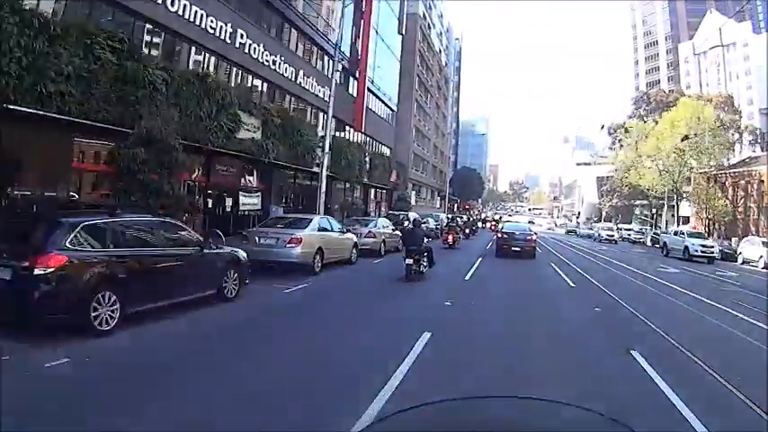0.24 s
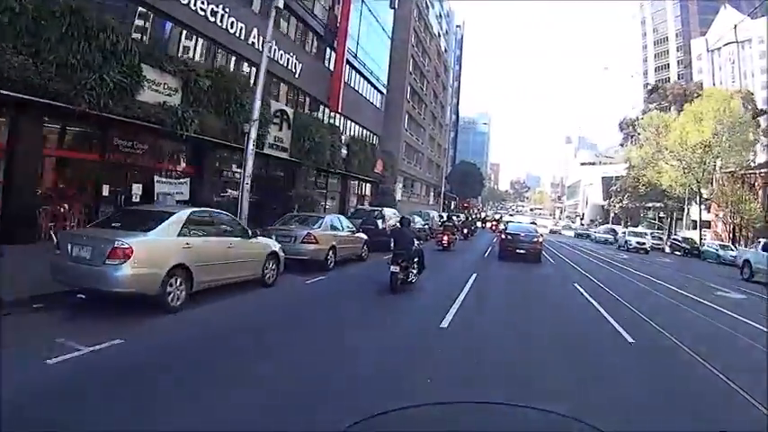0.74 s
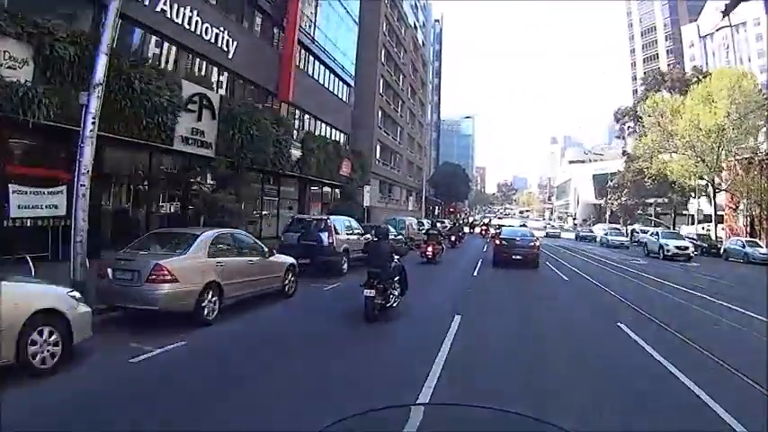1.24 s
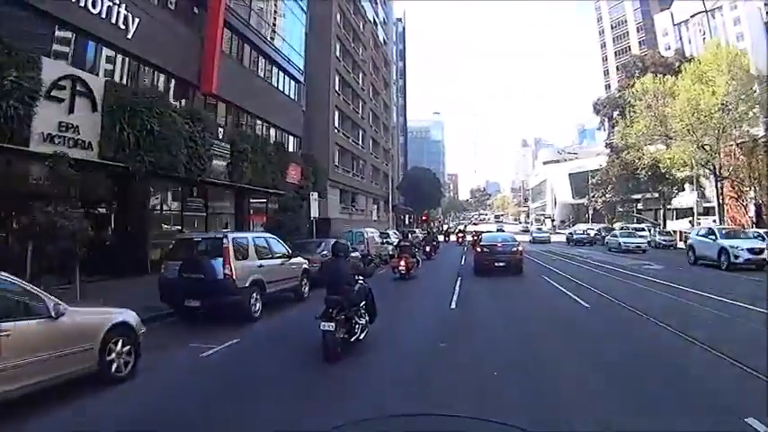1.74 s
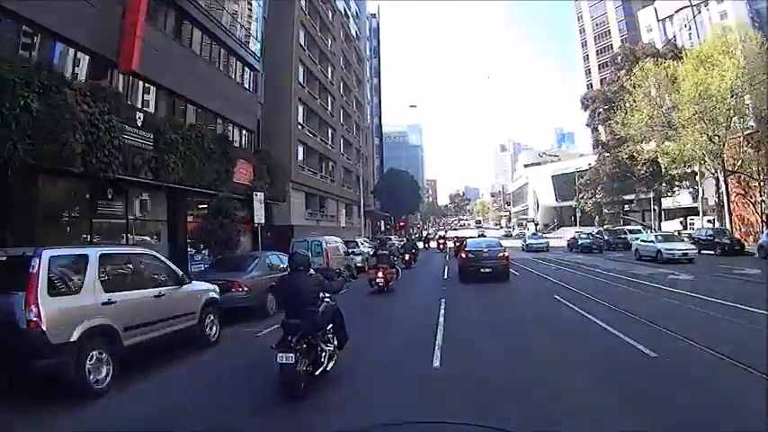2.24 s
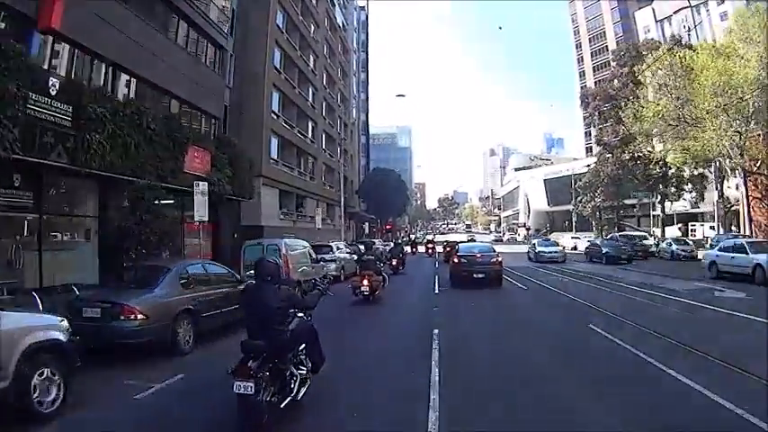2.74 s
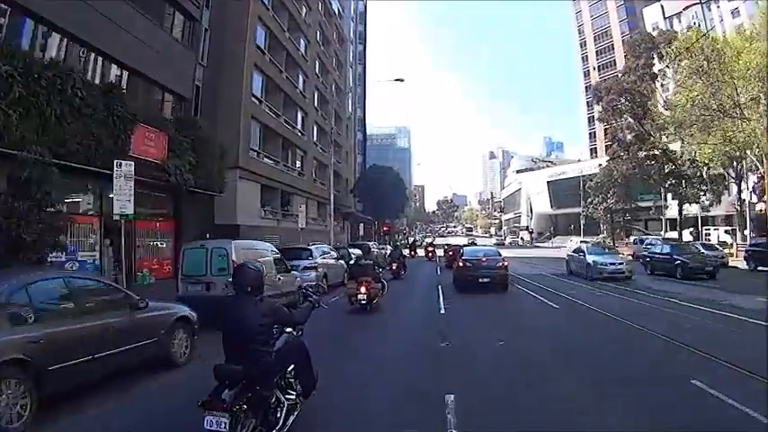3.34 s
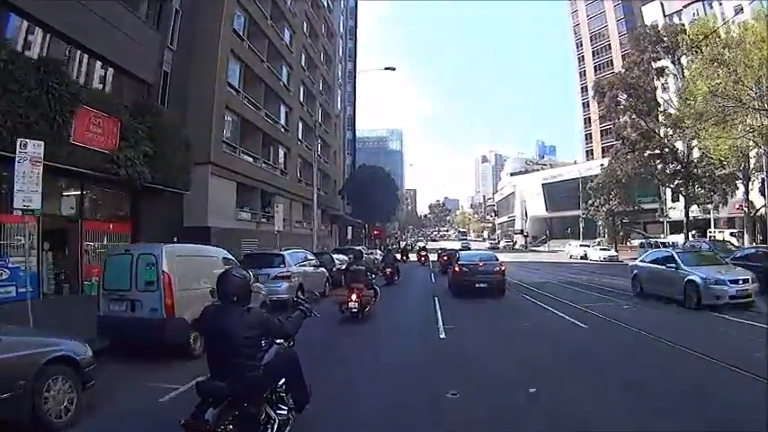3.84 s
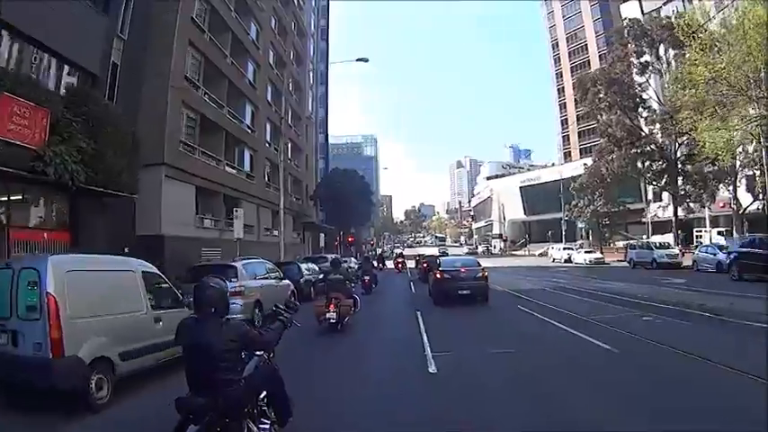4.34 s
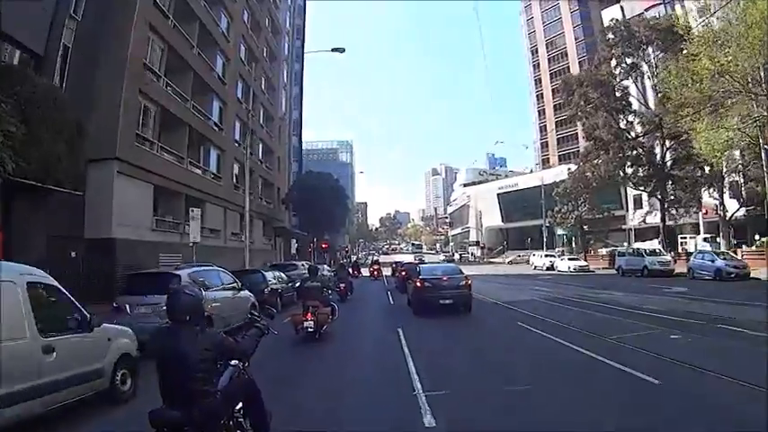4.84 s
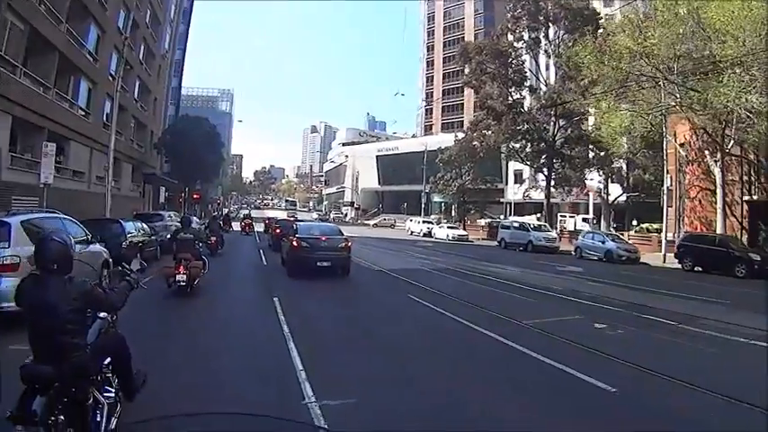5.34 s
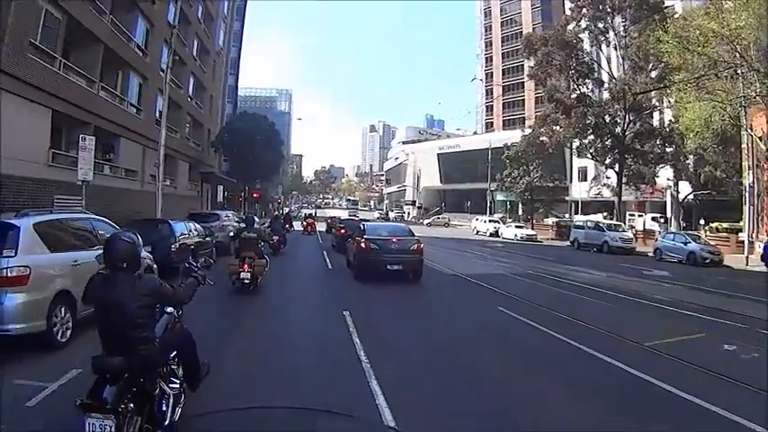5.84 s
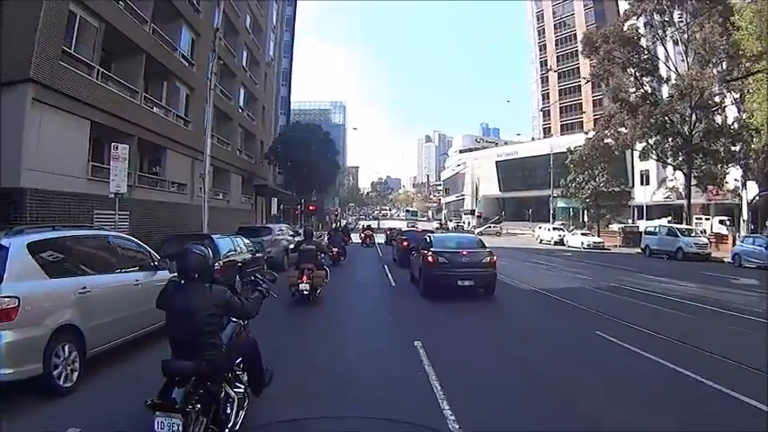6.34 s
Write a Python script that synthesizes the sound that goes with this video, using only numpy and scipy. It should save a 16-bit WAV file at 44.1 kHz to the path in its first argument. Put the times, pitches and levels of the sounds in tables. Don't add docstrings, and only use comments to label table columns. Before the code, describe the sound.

Heard from a small enclosed camera on a motorcycle coasting along a city street behind other bikes. From 0 to 1.5 s the engine is under most load: dense rattling clatter, a hollow mid-pitched roar and low, uneven exhaust thuds, with hard chain slaps around 0.7-1.2 s and a sweep of air near 1.2 s. The clatter then drops and the twin settles into a low, lumpy rumble with brief throttle swells near 1.4, 3.2 and 6 s. A metallic clack ticks steadily, about three per second, clearer after 1.7 s. A thin, high brake squeal at nearly constant pitch chirps on and off, strongest around 2.5 s, recurring to the end. Light chain slaps cluster near 4.2 s, with a small air puff and slight engine rise around 4.3 s. Tyre hiss, a nearby car's faint hum and distant traffic continue underneath; wide but boxy stereo, dull at the very top.

```python
import sys
import numpy as np
from scipy import signal
from scipy.fft import rfft, irfft, next_fast_len
from scipy.io import wavfile
from scipy.ndimage import uniform_filter1d, map_coordinates

SR = 44100
rng = np.random.default_rng(int(sys.argv[2]) if len(sys.argv) > 2 else 0)


def wav_record(signal):
    frames = np.transpose(np.atleast_2d(signal))
    bounded = np.clip(frames, -1, 1)
    quanta = np.round(bounded * 32767).astype(np.int16)
    wavfile.write(sys.argv[1], SR, quanta)


def rack_gain(trim_db):
    fader = np.asarray(trim_db, float)
    return 10 ** (fader / 20)


N = 290178


def unit(x):
    return x / np.sqrt(np.mean(x ** 2) + 1e-20)


def curves(rows):
    s, *cols = np.transpose(rows)
    return [np.interp(np.arange(N) / SR, s, c) for c in cols]


def on_log(rows, hz):
    f, *cols = np.transpose(rows)
    return [np.interp(np.log(hz + 1), np.log(f + 1), c) for c in cols]


def wobble(rate):
    knots = rng.standard_normal(int(N * rate / SR) + 4)
    curve = map_coordinates(knots, [np.arange(N) * rate / SR])
    return curve - uniform_filter1d(curve, size=SR // 5)


def swells(rows):
    s, length, *gains_db = np.transpose(rows)
    t = np.arange(0, N + 99, 100) / SR
    bells = np.exp(-(2 * (t[:, None] - s) / length) ** 2)
    return [np.interp(np.arange(N) / SR, t, bells @ g) for g in gains_db]


def filtered(x, response):
    m = next_fast_len(N + SR // 2)
    return irfft(rfft(x, m) * response(np.fft.rfftfreq(m, 1 / SR)), m)[..., :N]


def ring(x, modes, steep):
    def response(f):
        power = 0
        for c, w, db in modes:
            power = power + rack_gain(2 * db / steep) * (f * w) ** 2 / ((c * c - f * f) ** 2 + (f * w) ** 2)
        cepstrum = irfft(steep / 2 * np.log(power + 1e-9))
        half = len(cepstrum) // 2
        cepstrum[1:half] *= 2
        cepstrum[half + 1:] = 0
        return np.exp(rfft(cepstrum))
    return filtered(x, response)


def noise():
    return rng.standard_normal((2, N))


def firings(rate, uneven, jitter, scatter_db):
    k = np.arange(1, int(np.sum(rate) / SR))
    chance = rng.standard_normal((len(k), 3))
    turns = k + uneven * (k % 2) + jitter * chance[:, 0]
    at = np.interp(turns, np.cumsum(rate) / SR, np.arange(N)).astype(int)
    shared = np.bincount(at, rack_gain(scatter_db * chance[:, 1]), N)
    return np.array([shared, np.bincount(at, chance[:, 2], N)])


def puffs(beats, t60, rise):
    t = np.arange(SR // 10) / SR
    envelope = (1 - np.exp(-t / rise)) * rack_gain(-60 * t / t60)
    return signal.fftconvolve(beats, envelope[None], axes=1)[:, :N]


# time_s, level_db
LOAD = [(0.0, -27), (0.48, -26), (1.28, -30.5), (1.43, -33), (2.22, -37.5), (2.56, -37), (3.76, -39.5),
        (4.16, -38), (4.34, -35.5), (4.69, -36), (5.46, -40.5), (5.96, -38.5), (6.17, -37), (6.58, -38.5)]


def strain_db():
    load_db = curves(LOAD)[0]
    return load_db - load_db.mean()


# pitch_hz, level_db (per Hz)
TYRES = [(500, -11.5), (700, -11), (780, -0.5), (880, -1.5), (990, 0.5), (1180, -3.5), (1320, -11.5),
         (1500, -15), (3000, -15), (11000, -31)]
# pitch_hz, level_db (per Hz)
TRAFFIC = [(20, -21), (45, 7), (300, -1), (400, 1), (600, 3.5), (750, 1), (1000, -19), (2000, -54)]
# start_s, rise_s
# (negative: a jump, no ramp), far_db, near_db
CAR = (1.5, -0.8, -52, -43)
# pitch_hz, width_hz, level_db
CAR_HUM = [(978, 67, 1.5), (800, 69, -4)]


def street():
    def wash(colour):
        hiss = unit(filtered(noise(), lambda hz: rack_gain(on_log(colour, hz)[0])))
        return rack_gain(3.2 * wobble(9.8)) * hiss

    s, rise, *far_near_db = CAR
    car_db = np.interp(np.arange(N) / SR, (s, s + rise), far_near_db)
    flecks = rack_gain(2.5 * wobble(14))
    car = flecks * rack_gain(car_db) * unit(ring(noise(), CAR_HUM, steep=1.82))
    tyre_db = -37.5 + 0.36 * strain_db()
    echo_db = 0.56 * swells(BLIPS)[1]
    traffic_db = -37 + 0.55 * strain_db() + echo_db
    return rack_gain(tyre_db) * wash(TYRES) + rack_gain(traffic_db) * wash(TRAFFIC) + car


# time_s, firings_per_s, beat_db (clean beat's share of the low sound)
REVS = [(0, 40, -1.5), (.3, 41.6, 2), (.7, 36.3, -9.5), (1.1, 41, 0.5), (1.5, 38, -3), (1.8, 32.4, -3.5),
        (2.4, 35, -5.5), (3.0, 39, -10.5), (3.25, 36.3, 0), (3.7, 42, -14), (4.3, 36.3, -6),
        (5.2, 45.6, -12.5), (6.0, 34.6, -6), (6.58, 37.4, -3.5)]
# time_s, level_db
THROTTLE = [(0, -29), (.9, -31), (2.2, -33.5), (3.5, -33.5), (4.5, -33), (6.58, -33.5)]
# middle_s, length_s, thud_gain_db, bark_gain_db
BLIPS = [(.06, 0.25, 5.5, 3), (.61, .08, 3.5, 1.5), (.84, 0.02, 0, 5), (1.12, 0.057, 2, 1),
         (1.36, 0.28, 5.5, 5.5), (1.7, .08, -3.5, 6.5), (2.33, 0.12, -1.5, 4.5), (3.21, 0.19, 7, -3),
         (3.73, 0.076, 5, 1.5), (4.05, 0.052, 3.5, -5), (4.47, 0.12, 0, 3), (5.08, 0.041, 2, 0.5),
         (5.5, 0.089, 1.5, -2.5), (6.04, 0.082, 7.5, -1), (6.36, .08, 6.5, -2.5), (6.57, 0.074, 4, 3)]
# pitch_hz, width_hz, level_db
THUD = [(82, 31, 1), (131.5, 61, -3.5)]
# pitch_hz, width_hz, level_db
BARK = [(178.3, 41, 5.5), (204.4, 82, 0), (260, 20, -1.5), (342, 250, -19.5)]


def exhausts(beats):
    def centred(x):
        return unit(x - x.mean(axis=1, keepdims=True))

    def follow(x):
        power = uniform_filter1d(np.mean(x ** 2, axis=0), size=SR // 2)
        return x / np.sqrt(np.abs(power) + 1e-20)

    ahead = firings(27 * rack_gain(0.52 * wobble(6)), uneven=0.1494, jitter=0.0958, scatter_db=4.0)
    own = rack_gain(curves(REVS)[1] - 1.0) * centred(beats)
    gas = own + 0.3 * centred(ahead) + 0.61 * noise()
    throttle_db = curves(THROTTLE)[0]
    punch_db, snarl_db = swells(BLIPS)
    tilt_db = 0.23 * strain_db()
    thud_db = throttle_db + punch_db - 2 - tilt_db + 1.5 * wobble(9)
    bark_db = throttle_db + snarl_db - 4.5 + tilt_db + 1.5 * wobble(9.4)
    thud = follow(ring(gas, THUD, steep=1.62))
    bark = follow(ring(gas, BARK, steep=2.18))
    return rack_gain(thud_db) * thud + rack_gain(bark_db) * bark


# pitch_hz, width_hz, level_db
MAIN_MODE = [(1555, 182, 3), (1720, 200, 2)]
# pitch_hz, width_hz, level_db
HIGH_MODES = [(2644, 350, -4.5), (3044, 535, 1), (4210, 304, -4.5), (5096, 770, -10.5), (6010, 580, -20)]
# pitch_hz, width_hz, level_db
TOP_MODES = [(7310, 1000, 0.5), (8680, 290, -8)]
# pitch_hz, width_hz, level_db
AIR_MODES = [(9600, 580, 7), (10700, 1000, -16)]
# middle_s, length_s, gain_db
GUSTS = [
    (1.2, 0.55, 5),
    (4.28, 0.22, 4.5),
]


def machinery(beats):
    strain, gust_db = strain_db(), swells(GUSTS)[0]
    pulse = 0.92 + 0.17 * unit(puffs(beats[:1], t60=0.12, rise=0.0024))
    sizes = rack_gain(2.7 * rng.standard_normal(size=1100))
    grains = np.array([np.bincount(rng.integers(0, N, size=1100), sizes, N)] * 2)
    rattle = puffs(grains, t60=0.024, rise=0.0037)

    def stir(loose):
        return unit(pulse * noise()) + loose * unit(rattle * noise())

    shake = wobble(18)
    clatter = unit(ring(rack_gain(0.62 * shake + 0.49 * wobble(30)) * stir(loose=0.72), HIGH_MODES, steep=1.96))
    edge = filtered(clatter, lambda hz: 1 / (1 + (3730 / (hz + 1)) ** 8))
    clatter = clatter + (rack_gain(0.17 * strain) - 1) * edge
    sheen = unit(ring(rack_gain(0.8 * shake + 1.4 * wobble(33)) * stir(loose=1.0), TOP_MODES, steep=1.54))
    roar = unit(ring(rack_gain(1.04 * wobble(25)) * stir(loose=0.27), MAIN_MODE, steep=1.576))
    air = unit(ring(stir(loose=1.0), AIR_MODES, steep=1.3))

    clatter_db = curves(LOAD)[0] + 4.5
    roar_db = -24 + 0.57 * strain + 0.4 * gust_db
    sheen_db = -51.5 + 0.75 * strain + gust_db
    air_db = 0.42 * sheen_db - 34.0
    top = rack_gain(sheen_db + 1.0) * sheen + rack_gain(air_db) * air
    return rack_gain(clatter_db) * clatter + top + rack_gain(roar_db) * roar


# start_s, length_s, level_db
SQUEAL = [(0.035, 0.13, -38), (0.325, .09, -35.5), (0.497, 0.19, -27.5), (1.017, 0.28, -34.5),
          (1.355, 0.088, -30), (1.83, 0.23, -33.5), (2.17, 0.14, -56), (2.478, 0.13, -18.5),
          (2.694, 0.037, -29), (2.74, 0.076, -23), (2.941, 0.045, -35), (3.146, 0.17, -29.5),
          (3.378, 0.058, -26), (3.45, 0.09, -23.5), (3.577, 0.1, -35), (4.104, 0.12, -28),
          (4.347, 0.048, -35), (4.408, 0.036, -21), (4.625, 0.11, -25), (4.874, 0.2, -29),
          (5.516, 0.19, -27.5), (6.056, 0.042, -27.5), (6.158, .11, -27.5), (6.354, 0.095, -37),
          (6.547, 0.075, -29)]
# time_s, pitch_hz
DISC_HZ = [(0, 1552), (2.5, 1548), (3.5, 1537), (4.2, 1547), (4.9, 1537), (5.6, 1533), (6.58, 1535)]
# multiple, level_db
OVERTONES = [(1, 0.5), (2, -20), (3, -34)]


def brake():
    t = np.arange(N) / SR
    grip = sum(rack_gain(db) * ((t > s) & (t < s + length)) for s, length, db in SQUEAL)
    grip = uniform_filter1d(grip, size=SR // 80) + rack_gain(-37.5)
    turn = 2 * np.pi * np.cumsum(curves(DISC_HZ)[0] + 4 * wobble(30)) / SR
    tone = sum(rack_gain(db) * np.sin(k * turn) for k, db in OVERTONES)
    return grip * rack_gain(2.0 + 1.5 * wobble(60)) * np.array([tone, .05 * tone])


# pitch_hz, width_hz, level_db
TICK_MODES = [
    [(2940, 920, 0)],
    MAIN_MODE,
    [(2230, 260, 0)],
    [(4910, 1270, 10.5), (7300, 790, -7), (9550, 1900, -9)],
]
# start_s, peak_db, main_mode_db, bracket_ring_db (last two against the usual share)
TURNS = [(0.1796, -23, 3, -8), (0.462, -21, 6, -15), (0.7634, -33, 2, -10), (1.0721, -14, 1, -11),
         (1.3953, -16.5, 4.5, -12), (1.7165, -18, -1, 3), (2.0333, -19, 1.5, -6), (2.3616, -17.5, 0.1, 2),
         (2.6905, -17, -1, -6), (3.017, -23.5, 9.2, -14), (3.3417, -16.5, 0.1, -11), (3.6709, -17, 4.2, -3),
         (3.9977, -15, 1, -6), (4.3335, -18.5, 1, -8), (4.6689, -18.5, 4, -4), (5.0075, -17, 2.5, -14),
         (5.3431, -16.5, 3, -15), (5.6813, -18, 4, -13), (6.0176, -18, 1.5, -13), (6.3652, -16, 1.3, -17)]
# start_s, peak_db
SLAPS = [(0.6898, -13), (0.813, -8.5), (0.9364, -10.5), (1.167, -8.5), (1.3039, -17), (1.9356, -25),
         (2.481, -27), (2.8024, -24), (3.1253, -22.5), (3.404, -26), (3.9234, -34), (4.1964, -17),
         (4.245, -16), (4.294, -20.5), (4.4428, -29), (5.1188, -29), (5.5123, -37), (6.0564, -20.5),
         (6.2434, -29), (6.4778, -25.5)]


def drive():
    turn_colour_db, slap_colour_db = (0.5, 9.5, 4, -11), (2, 6, 4.5, -11)
    rows = [(s, db, *np.add(turn_colour_db, (0, main_db, ring_db, 0))) for s, db, main_db, ring_db in TURNS]
    rows += [(s, db, *np.add(slap_colour_db, (0, 0, -7.5, 0))) for s, db in SLAPS]
    s, db, *parts_db = np.transpose(rows)
    parts_db = parts_db + 1.5 * rng.standard_normal((len(s), 4)).T
    at = ((s - .001) * SR).astype(int)
    clear_db = np.interp(s, (1.2, 1.7), (-6, 0))
    blows, gains_db = (3.2, 17.7, 13, 1.3), (8.5, 1.0, 9, 5.5)
    total = 0
    for modes, part_db, blow, gain_db in zip(TICK_MODES, parts_db, blows, gains_db):
        hits = np.array([np.bincount(at, rack_gain(db + part_db + gain_db + clear_db), N)] * 2)
        contacts = puffs(hits, t60=0.027, rise=0.00054) + 0.25 * puffs(hits, t60=0.14, rise=0.0021)
        chatter = contacts * noise()
        knock = [[blow], [0]] * np.roll(hits, 50, axis=1)
        total = total + ring(knock + chatter, modes, steep=1.94)
    return total


# pitch_hz, likeness_0_to_1, left_lead_rad, left_over_right_db
PORTS = [(60, 0.96, 0.52, 0.5), (240, 0.94, 0.78, -0.5), (481, 0.53, 2.76, 2), (750, 0.46, 3.97, 1),
         (1310, 0, 5.66, 0), (1580, 0.88, 7.1, 2.5), (2110, 0.92, 7.04, 2.5), (2300, 0.3, 7.5, -7),
         (2710, 0.92, 8.46, 6.5), (3013, 1, 7.79, -2.5), (3760, 0.46, 9.34, 1.5), (4140, 0.93, 10.07, -1),
         (4715, 0.99, 6.3, 1.5), (5540, 0.2, 5.3, -4.5), (6140, 0.47, 7.27, 2.5), (11100, 0.87, 7.94, -1.5)]


def ports(pair):
    def side(sign):
        def response(hz):
            alike, lead, over_db = on_log(PORTS, hz)
            u = np.arccos(np.clip(alike, 0, 1)) / 2
            return rack_gain(sign * over_db / 2) * np.exp(.5j * sign * lead) * [np.cos(u), sign * np.sin(u)]
        return filtered(pair, response).sum(axis=0)
    return np.array([side(0.98), side(-1.034)])


def scene():
    beats = firings(curves(REVS)[0], uneven=.06, jitter=.015, scatter_db=1.2)
    return ports(street() + exhausts(beats) + machinery(beats) + brake() + drive())


def roll_off(x):
    return signal.sosfilt(signal.butter(12, 11300, fs=SR, output="sos"), x)


def record(dry):
    mix = filtered(dry, lambda hz: 1 / np.sqrt(1 + (hz / 10980) ** 300))
    return roll_off(mix)


dry = scene()
out = record(dry)
wav_record(out)
```